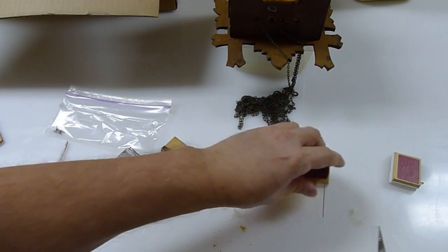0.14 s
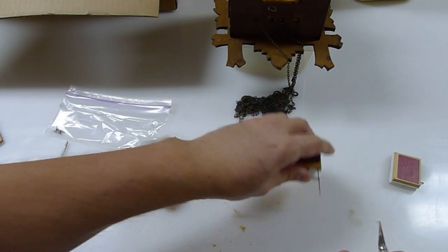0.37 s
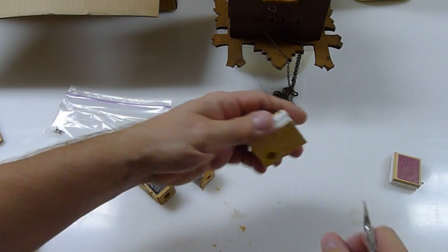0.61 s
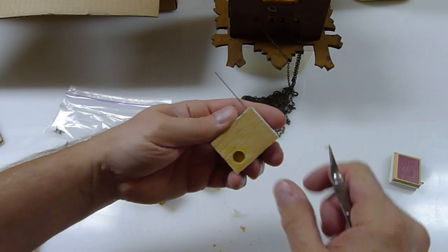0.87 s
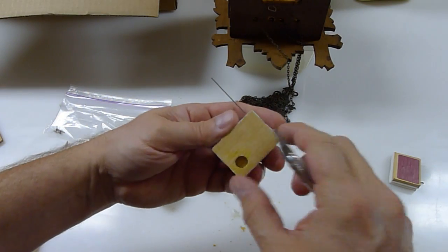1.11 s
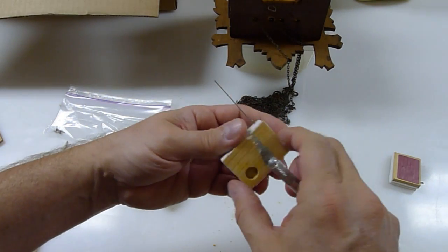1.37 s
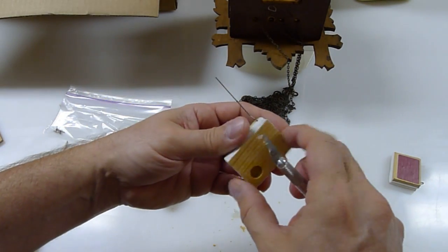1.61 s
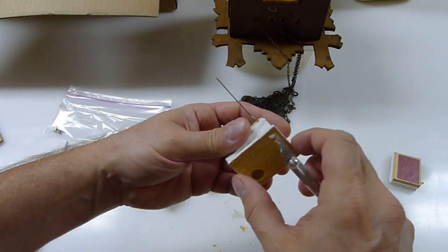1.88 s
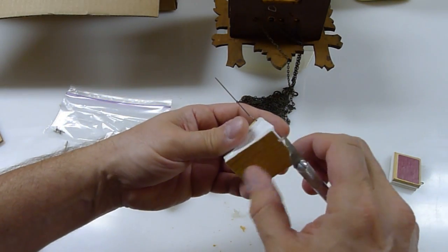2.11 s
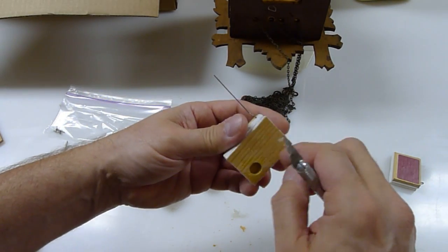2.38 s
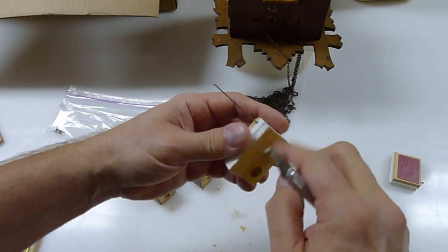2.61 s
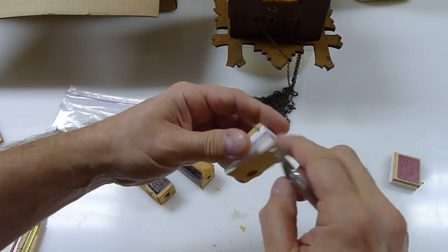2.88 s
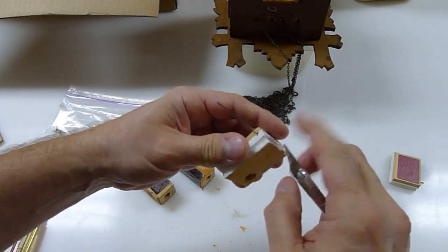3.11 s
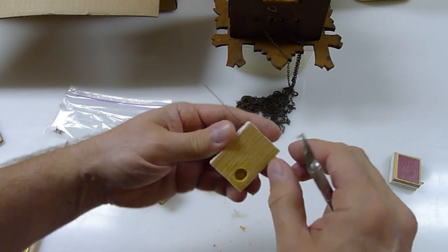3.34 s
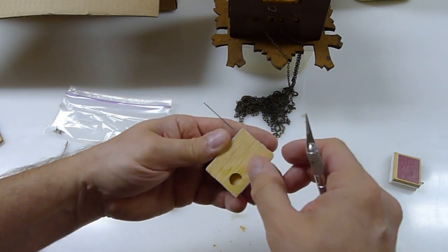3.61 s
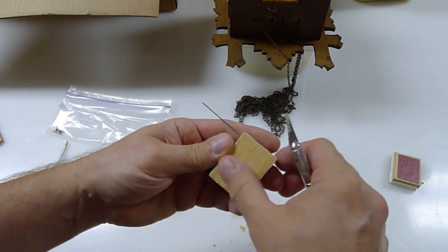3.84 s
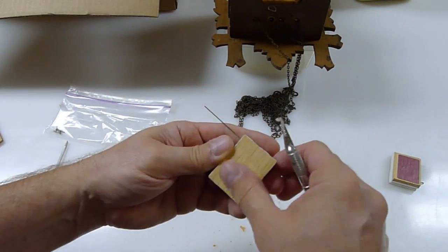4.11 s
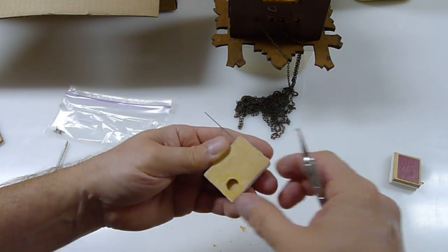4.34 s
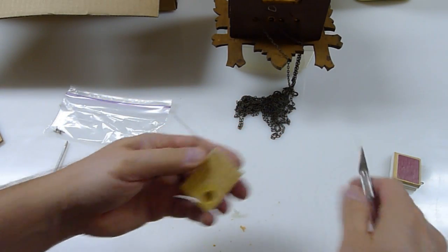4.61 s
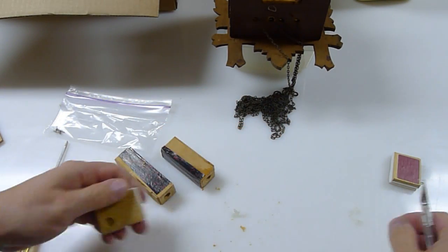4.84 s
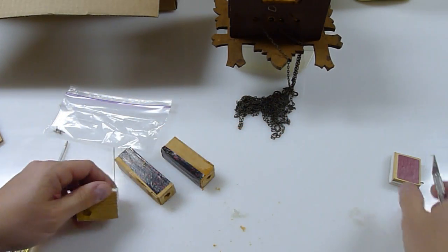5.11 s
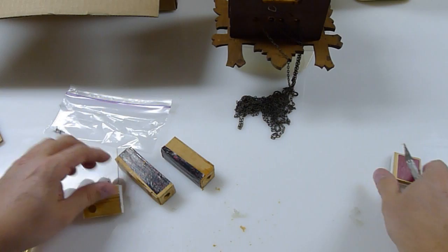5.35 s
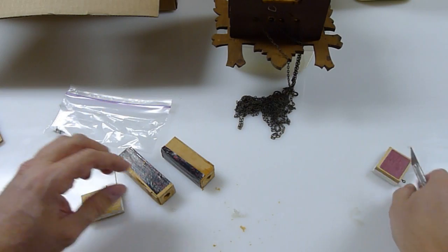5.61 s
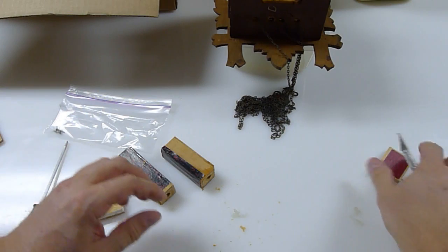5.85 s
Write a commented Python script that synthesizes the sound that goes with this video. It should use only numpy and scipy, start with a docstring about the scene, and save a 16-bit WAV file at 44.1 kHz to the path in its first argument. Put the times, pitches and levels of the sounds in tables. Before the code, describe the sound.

Two hard knocks of a small wooden box on a tabletop, then light blade ticks and soft thumb rubs, ending in a quick rattling drop.

```python
"""A quiet room: hands work on a small wooden box over a hard tabletop, close to the microphone.
First the box knocks twice on the table: a click, ringing box modes and a duller thud of the table.
Then a blade ticks on it and a thumb rubs it in bursts of tiny slips; faint sliding tones squeak midway.
At last it is dropped and rattles to rest in quickening bounces, and a thin wire on it rings on.
The ceiling returns an echo of every blow, the room a short tail; still air and a far rumble run throughout."""
import sys
import numpy as np
from scipy import signal
from scipy.fft import rfft, irfft
from scipy.io import wavfile
from scipy.ndimage import uniform_filter1d

SR = 44100
rng = np.random.default_rng(int(sys.argv[2]) if len(sys.argv) > 2 else 0)


def pcm_store(signal):
    """Save signal as 16-bit PCM."""
    levels = np.round(np.clip(np.atleast_2d(signal), -1, 1) * 32767)
    wavfile.write(sys.argv[1], SR, levels.astype(np.int16).T)


def convert_level_to_amplitude(level_db):
    """Map a level in decibels to its linear amplitude factor."""
    exponent = np.asarray(level_db, float) / 20
    return 10 ** exponent


N = 263277  # samples


def evened(x):
    """Scales to rms 1."""
    return x / np.sqrt(np.mean(x ** 2) + 1e-20)


def read(points, hz):
    """Straight lines on a log-frequency axis."""
    f, value = np.transpose(points)
    return np.interp(np.log(hz + 1), np.log(f + 1), value)


def add(mix, s, sound):
    """Mixes a sound in at time s."""
    part = mix[round(s * SR):][:len(sound)]
    part += sound[:len(part)]


def coloured(x, gain_db):
    """Filters x by a gain in dB given as a function of frequency."""
    hz = np.fft.rfftfreq(len(x), 1 / SR)
    return irfft(rfft(x) * convert_level_to_amplitude(gain_db(hz)), len(x))


def resonate(x, hz, width):
    """Shifts hz down to zero, smooths, and shifts back: a resonance of gain 1."""
    turn = np.exp(2j * np.pi * hz * np.arange(len(x)) / SR)
    r = np.exp(-np.pi * width / SR)
    return 2 * (turn * signal.lfilter([1 - r], [1, -r], x / turn)).real


# Colour of the still air at the microphone: (f/Hz, relative level per Hz/dB)
AIR_COLOUR = [(12, -44.5), (20, -44), (86, -9.5), (141, -22), (164, -7), (195, 0), (220, 1.5), (344, -8),
              (371, -24), (499, -6.5), (639, -8), (973, -5), (1520, -8.5), (3610, -11.5), (7400, -22),
              (9620, -45), (16300, -120)]
# Swells of a far rumble: (t/s, level/dB)
RUMBLE_SWELL = [(0.0, -52.5), (0.1, -53.5), (0.25, -64), (0.48, -63.5), (1.03, -59), (1.36, -56.5),
                (1.76, -60), (2.28, -53), (3.01, -58), (4.22, -56.5), (4.64, -59), (5.02, -54.5),
                (5.39, -54), (5.67, -63.5), (5.97, -59)]
# Tabletop modes stirred by resting arms: (f/Hz, level/dB, width/Hz)
TABLETOP_HUM = [(167.2, -65.5, 6.7), (115, -72.5, 12)]


def air():
    """Still air as patchy noise, a wavering far rumble and the faint stir of the tabletop."""
    air_db = -53.5
    rumble_hz, rumble_width_hz = 370, 390  # the width of each of two passes
    a, b, patches = rng.standard_normal((N // 256 + 5, 513, 3)).T
    patches = evened(uniform_filter1d(uniform_filter1d(patches, 14, 0), 20, 1))
    colour_db = read(AIR_COLOUR, np.fft.rfftfreq(1024, 1 / SR))[:, None]
    z = (a + 1j * b) * convert_level_to_amplitude(colour_db + 0.93 * patches)
    out = convert_level_to_amplitude(air_db) * evened(signal.istft(z, nperseg=1024, noverlap=768)[1][:N])
    far = resonate(rng.standard_normal(N), rumble_hz, rumble_width_hz)
    far = resonate(far, rumble_hz, rumble_width_hz)
    swell_db = np.interp(np.arange(N) / SR, *np.transpose(RUMBLE_SWELL))
    out += convert_level_to_amplitude(swell_db) * evened(far)
    for hz, db, width in TABLETOP_HUM:
        out += convert_level_to_amplitude(db) * evened(resonate(rng.standard_normal(N), hz, width))
    return out


# Decay of the room around the table: (f/Hz, t60/s)
ROOM_DECAY = [(150, 0.65), (600, 0.18), (1500, 0.36), (3000, 0.3), (5000, 0.33), (8000, 0.29)]


def room(x):
    """Sparse taps of random sign; three tails fade in and out in turn so that like blows differ."""
    out, t = np.zeros(N), np.arange(N) / SR
    for k in range(3):
        taps = np.zeros(SR // 2)
        at = np.arange(420, len(taps) - 20, 20)
        taps[at + rng.integers(0, 20, len(at))] = rng.choice([-1., 1.], len(at))
        hz, s, z = signal.stft(taps, SR, nperseg=256)
        decay = convert_level_to_amplitude(-60 * s / read(ROOM_DECAY, hz)[:, None])
        tail = signal.istft(z * decay, SR, nperseg=256)[1]
        turn = np.sqrt(2 / 3) * np.cos(np.pi * (3.1 * t + k / 3))
        out += signal.oaconvolve(x * turn, tail / np.linalg.norm(tail))[:N]
    return out


# Tones on which the tail lingers, perhaps panels nearby: (f/Hz, width/Hz, level/dB re the tail)
PANEL_TONES = [(850, 110, -0.5), (1425, 150, -1), (1750, 140, -3), (2870, 150, 0), (3120, 100, -1.5),
               (4360, 130, -5), (4680, 98, 2), (5600, 160, -3), (6130, 150, -8.5)]


def panels(tail):
    """Narrow resonances driven by the room tail."""
    return sum(convert_level_to_amplitude(db) * resonate(tail, hz, width) for hz, width, db in PANEL_TONES)


# Faint thin squeaks near the box: (start t/s, length t/s, mid-slide f/Hz, level/dB)
SQUEAK_CALLS = [(1.755, .07, 6800, -63), (1.83, .06, 7160, -62), (1.91, .045, 4850, -64)]


def squeaks():
    """Short near-sine squeaks that swell, slide up and fade."""
    rise_hz_per_s = 1300
    out = np.zeros(N)
    for s, length, hz, db in SQUEAK_CALLS:
        t = np.arange(0, length, 1 / SR)
        turns = np.cumsum(hz + rise_hz_per_s * (t - length / 2)) / SR
        swell = np.sqrt(2 * np.sin(np.pi * t / length))
        add(out, s, convert_level_to_amplitude(db) * swell * np.sin(2 * np.pi * turns))
    return out


# The thin wire on the box: (f/Hz before a small detuning, t60/s, level/dB re each bounce)
WIRE_RING = (2140, 1.1, -39)


def wire():
    """The later bounces of the dropped box shake the wire, which rings on as a decaying sine."""
    out, t = np.zeros(N), np.arange(SR // 2) / SR
    hz, t60, re_bounce_db = WIRE_RING
    for (s, db, *_), phase in zip(BOUNCES[5:], rng.random(len(BOUNCES))):
        detuned_hz = hz * (1 + .03 * (phase - .5))
        envelope = convert_level_to_amplitude(db + re_bounce_db - 60 * t / t60) * np.minimum(t / 0.0058, 1)
        add(out, s, envelope * np.sin(2 * np.pi * (detuned_hz * t + phase)))
    return out


# Thumb strokes on the wood: (start t/s, pressing t/s, lifting t/s, level/dB, brightness/dB per octave)
STROKES = [(0.45, .08, 0.15, -62, -9), (1.13, .05, 0.06, -55, 7.5), (1.395, 0.012, 0.023, -48.5, 11),
           (1.485, 0.0053, 0.057, -39, 12.5), (1.598, 0.014, 0.035, -54.5, 4),
           (2.962, .014, 0.033, -54.5, -1), (3.025, .03, 0.038, -48.5, -3), (3.11, 0.13, 0.18, -54, -9),
           (3.485, .03, .045, -58, -5), (3.655, 0.021, .03, -60, 3), (3.803, 0.027, .022, -48, -4),
           (3.887, 0.059, 0.064, -40.5, -0.5), (4.094, 0.016, .18, -51, 4), (4.215, 0.055, .065, -42, -1.5),
           (5.08, 0.032, 0.073, -53.5, 9)]
# Colour of skin sliding on wood: (f/Hz, relative level per Hz/dB)
SKIN_COLOUR = [(1000, -41.5), (1800, -13), (2300, -8), (2650, -27), (2950, -1), (3800, -1), (4600, -5.5),
               (5600, -10), (7000, -10.5), (9500, -22.5)]


def rubs():
    """Dense tiny slips of skin ridges, coloured by the wood; each stroke presses in, then lifts off."""
    peakedness = 0.99  # below 1 = firm edges and a broad top, above 1 = a sharp top
    slips = rng.standard_normal(N) * convert_level_to_amplitude(0.83 * np.minimum(rng.exponential(1, N), 4))
    hz, t, z = signal.stft(slips, SR, nperseg=256, noverlap=192)
    power = np.zeros(z.shape)
    for s, press_s, lift_s, db, tilt_db in STROKES:
        ramp = np.interp(t, [s, s + press_s, s + press_s + lift_s], [0, 1, 0])
        pressure = np.sin(np.pi / 2 * ramp) ** peakedness
        shape = convert_level_to_amplitude(read(SKIN_COLOUR, hz) + tilt_db * np.log2(hz / 4000 + 0.024)) ** 2
        power += np.outer(shape / shape.mean(), (convert_level_to_amplitude(db) * pressure) ** 2)
    return signal.istft(z * np.sqrt(power), SR, nperseg=256, noverlap=192)[1][:N] / slips.std()


def ring(modes, t, rub_s):
    """The contact rolls over an edge, so modes start at their own moments; each ring is detuned a little every
    time."""
    hz, db, t60 = np.transpose(modes)[..., None]
    detune, start, sign = rng.random((len(modes), 3)).T[..., None]
    hz = hz * (1 + .08 * (detune - .5))
    age = np.maximum(t - rub_s * start ** 2, 0)
    rise = 1 - np.exp(-age * hz / 0.29)  # within about one cycle
    envelope = np.sign(sign - .5) * convert_level_to_amplitude(db - 60 * age / t60) * rise
    sound = (envelope * np.sin(2 * np.pi * hz * age)).sum(0)
    return sound / np.sqrt((sound ** 2).sum() / (.001 * SR))  # same energy for every group


def sideways(box, groups_db):
    """Averaged over all directions the modes merge: one pulse with the smooth colour of the groups."""
    spans = [(modes[0][0], modes[-1][0]) for modes in box]
    colour = [(spans[0][0] / 3, 0)]  # its level follows from the low group, below
    for (lo, hi), db in zip(spans, groups_db):
        colour.append((np.sqrt(lo * hi), db - 10 * np.log10((hi - lo) / 1000)))
    colour[0] = (colour[0][0], colour[1][1] - 18)
    colour.append((9000, colour[-1][1] - 8))
    return convert_level_to_amplitude(31.5) * coloured(signal.unit_impulse(512, "mid"), lambda f: read(colour, f))


# Modes of the hard tabletop under the box: (f/Hz, relative level/dB, t60/s)
TABLE_MODES = [(112.4, -11, 0.57), (170.6, -3, 0.39), (241.5, 2.5, 0.061), (336, -5, 0.079),
               (496, 7, 0.042)]


def blows(rows, box, click_db, click_t60, rise_cycles, rub_s, thud_db, echo_db, middle_db):
    """A click at the contact, the box and the table ringing, and the echo between table and ceiling."""
    press_s = 0.000984  # time to full contact
    ceiling_s, again_db = .0066, -30.5  # round trip, second trip re the first
    middle_hz, middle_db_per_octave = 2940, 11.5  # middle modes speak most for clicks pitched among them
    out, t = np.zeros((2, N)), np.arange(SR // 2) / SR  # towards the microphone, towards the walls
    hz, level_db, t60 = np.transpose(TABLE_MODES)[..., None]
    thud = (convert_level_to_amplitude(level_db - 60 * t / t60) * np.sin(2 * np.pi * hz * t)).sum(0)
    thud *= 1 - np.exp(-(t / 0.0092) ** 2)  # the heavy top takes a moment to move
    thud *= np.exp(-(t / .12) ** 4)  # the resting arm stills it
    for s, db, click_hz, box_db, tilt_db in rows:
        off_middle_db = middle_db_per_octave * abs(np.log2(click_hz / middle_hz))
        groups_db = box_db - tilt_db, box_db + middle_db - off_middle_db, box_db + tilt_db
        turns = click_hz * t
        click = np.sin(2 * np.pi * turns) * convert_level_to_amplitude(-60 * t / click_t60) * (1 - np.exp(-turns / rise_cycles))
        click *= convert_level_to_amplitude(click_db) / abs(click).max()
        bright = click + sum(convert_level_to_amplitude(g) * ring(modes, t, rub_s) for modes, g in zip(box, groups_db))
        add(out[0], s + press_s, convert_level_to_amplitude(db) * (bright + convert_level_to_amplitude(groups_db[0] + thud_db) * thud))
        add(out[1], s, convert_level_to_amplitude(db - 6.0) * click)  # the click points mostly upwards
        add(out[1], s - 256 / SR, convert_level_to_amplitude(db) * sideways(box, groups_db))  # the pulse sits 256 samples in
        echo = convert_level_to_amplitude(db + echo_db) * coloured(bright[:4096], lambda f: -9 * (f / 6000) ** 4)
        add(out[0], s + press_s + ceiling_s, echo)
        add(out[0], s + press_s + 2 * ceiling_s, convert_level_to_amplitude(again_db) * echo)
    return out


# Modes of the box in the hand, in low, middle and high groups:
# (f/Hz before a small detuning, relative level/dB, t60/s)
HELD_MODES = [
    [(604, -23, 0.0093), (890, 6, 0.0033), (1200, 9.5, 0.0055), (1470, 6, 0.0097)],
    [(1790, -2.5, .008), (2546, -10.5, 0.013), (2530, 3, 0.0067), (3010, 0.5, 0.015), (3280, -8, 0.016)],
    [(4180, 1.5, 0.0061), (4430, 2, 0.0055), (5170, -20, .006), (5340, -7, 0.0084), (5900, -4.5, 0.0085),
     (6800, -9.5, 0.011), (7770, 2, 0.0043)],
]
# Blade on the box: (t/s, level/dB, click f/Hz, box modes level/dB re the blow,
# tilt/dB added to the high group and taken from the low)
BLADE_TICKS = [(0.1767, -37, 1310, -16, -14), (1.1655, -44, 2350, -7, 5), (1.4103, -49.5, 1780, -6.5, 12),
               (1.4857, -27, 4960, -14, 6), (1.6082, -39, 3680, -16, 9), (2.0612, -29, 6170, -15, 6),
               (2.103, -35, 3780, -7.5, -1), (2.9724, -35, 2630, -15, -1), (3.0542, -36.5, 3280, -13, 0.3),
               (3.0822, -26, 2670, -15, 4.5), (3.088, -18.5, 3270, -19.5, 0.5), (3.0949, -31, 1000, -14, 1),
               (4.2, -43, 3850, -13, 3), (4.8322, -43.5, 3750, -7, 6)]


def ticks():
    """A blade taps the held box: slow-rising clicks with a weak thud."""
    return blows(BLADE_TICKS, HELD_MODES, click_db=-6, click_t60=.012, rise_cycles=2.5, rub_s=0.00294,
                 thud_db=-20.0, echo_db=-9, middle_db=7.5)


# Held box on the table: (t/s, level/dB, click f/Hz, box modes level/dB re the blow,
# tilt/dB added to the high group and taken from the low)
TABLE_KNOCKS = [(0.067, -8, 5200, -9, 5.5), (0.224, -6.5, 5500, -11, 5.5)]


def knocks():
    """The held box strikes the table squarely: short hard clicks, a full thud and a strong echo."""
    return blows(TABLE_KNOCKS, HELD_MODES, click_db=-1.3, click_t60=.007, rise_cycles=1.1, rub_s=0.001256,
                 thud_db=-6.0, echo_db=0.4, middle_db=10.1)


# Modes of the box let go, in low, middle and high groups:
# (f/Hz before a small detuning, relative level/dB, t60/s)
LOOSE_MODES = [
    [(322, -3.5, 0.021), (505, -9.5, 0.06), (650, -14, 0.044), (844, -5.5, 0.039), (1060, -5.5, 0.023),
     (1360, -13.5, 0.037)],
    [(1630, -2, 0.0069), (1950, -1.5, 0.011), (2350, -8, 0.013), (2840, 2.5, 0.0083), (3300, -5, 0.0074),
     (3840, -18, 0.028)],
    [(4210, -6.5, 0.017), (4790, -7, 0.01), (5000, -6.5, 0.015), (5700, -3.5, 0.012), (6300, -6, 0.0099),
     (6400, -4, 0.0075), (7440, -8, 0.011)],
]
# Bounces of the dropped box: (t/s, level/dB, click f/Hz, box modes level/dB re the blow,
# tilt/dB added to the high group and taken from the low)
BOUNCES = [(5.248, -16, 1740, -16.5, -9.5), (5.325, -7, 5580, -14, 2.5), (5.369, -13, 5860, -12, 1),
           (5.396, -26, 6600, -15, -1), (5.416, -19, 4300, -16, 7), (5.457, -16.5, 3900, -9.5, 4.5),
           (5.463, -19, 2340, -9, -1), (5.486, -29, 3490, -8.5, -8.5), (5.495, -29.5, 1950, -6, -1),
           (5.511, -20.5, 1950, -6, 3.5), (5.52, -20.5, 3500, -15, 1), (5.539, -23.5, 3750, -9.5, 2.5),
           (5.561, -28, 3580, -10, 4), (5.58, -26.5, 6470, -23, 9), (5.597, -32, 6300, -16, 5)]


def drop():
    """The box falls and rattles to rest; let go, most of its modes ring longer."""
    return blows(BOUNCES, LOOSE_MODES, click_db=-3, click_t60=.009, rise_cycles=2.5, rub_s=0.00307,
                 thud_db=-21.5, echo_db=-10, middle_db=6.2)


def scene():
    """Blows and rubs close by, their room tail, and the still air."""
    room_db = -11.5
    near = knocks() + drop() + ticks() + rubs()
    no_bass = signal.butter(2, 95, "high", fs=SR, output="sos")
    near = signal.sosfilt(no_bass, near)  # small parts push no deep bass
    tail = room(near[1])
    tail += panels(tail)
    return (near[0] + convert_level_to_amplitude(room_db) * tail + air() + squeaks() + wire())[None]


def roll_off(x):
    """The treble ends steeply here."""
    return signal.sosfilt(signal.butter(12, 9000, fs=SR, output="sos"), x)


# Band-limiting filter whose treble falls away in ripples: (f/Hz, gain/dB)
BAND_LIMIT = [(6000, 0), (7000, -4.5), (7400, -15), (7650, -15.5), (8050, -29), (8350, -18), (8650, -39),
              (8850, -20), (9400, -71)]


def record(dry):
    """A band-limiting filter whose treble falls away in ripples, then the end of the treble."""
    mix = coloured(dry[0], lambda f: read(BAND_LIMIT, f))[None]
    return roll_off(mix)


dry = scene()
out = record(dry)
pcm_store(out)
```